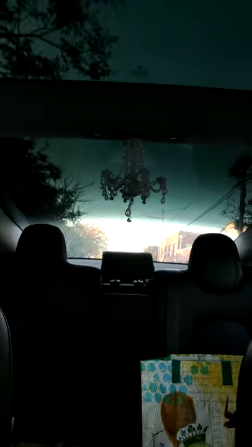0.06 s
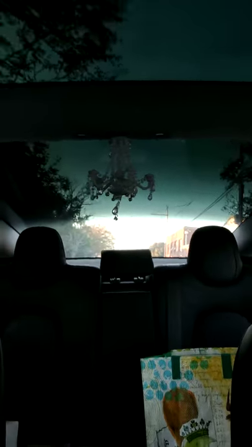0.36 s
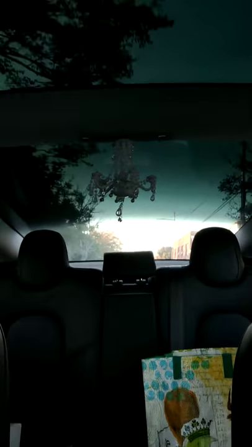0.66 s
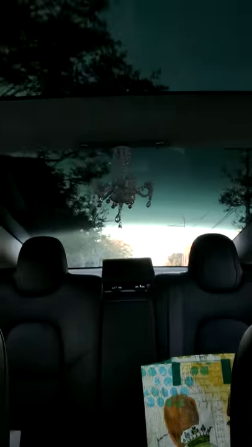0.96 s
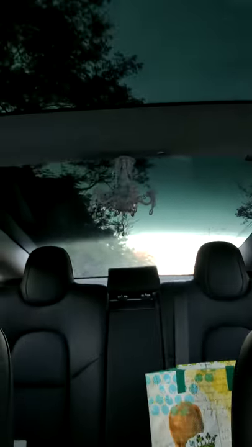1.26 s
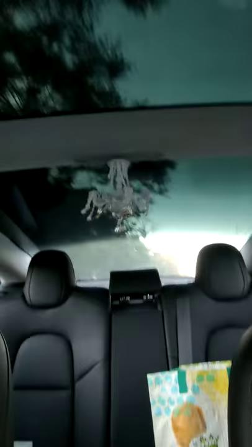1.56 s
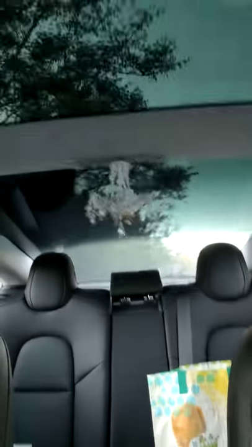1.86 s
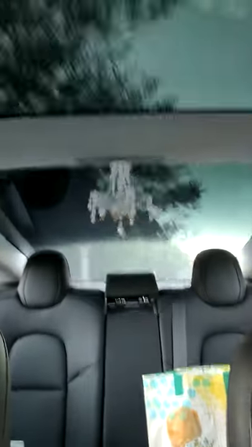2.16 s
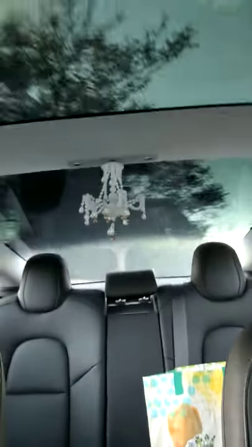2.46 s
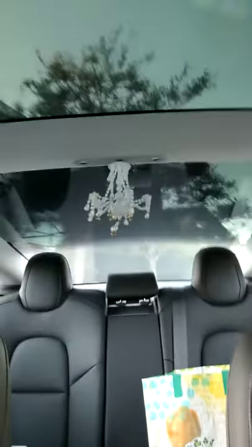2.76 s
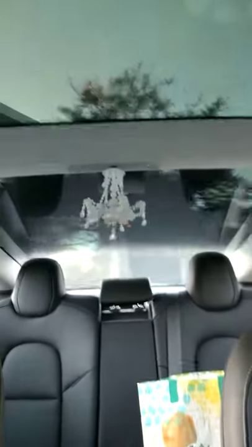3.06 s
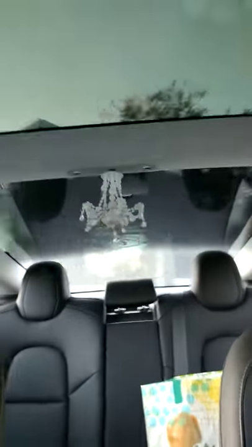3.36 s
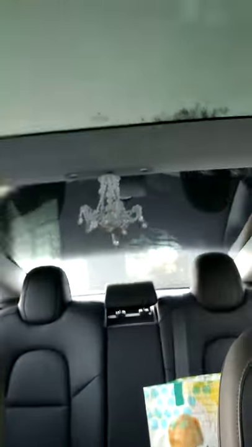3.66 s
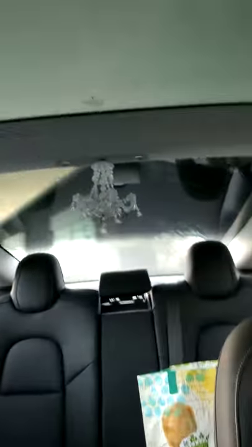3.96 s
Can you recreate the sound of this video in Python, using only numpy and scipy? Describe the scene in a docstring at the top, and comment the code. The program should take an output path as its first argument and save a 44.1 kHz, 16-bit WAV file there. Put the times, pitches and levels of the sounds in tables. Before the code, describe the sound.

Tiny bells on a hanging ornament tinkle faintly and very high inside a moving car, over deep road rumble and a lightly rattling panel. A turn indicator ticks five times, about every 0.7 seconds from 0.6 seconds. The wheels thump softly near 0.9 and 2.6 seconds. The tinkles come scattered at first, then thicken from about 3.3 seconds, with sharp little bead clacks until the end at 4 seconds.

```python
"""Tiny bells tinkle very high on an ornament that swings from the roof inside a moving car.
Each bell rings when its clapper hits and bounces. The ornament's beads rustle as they brush
each other and now and then clack together, and its glassy pendants clink faintly.
Below them the road rumbles, the wheels thump over bumps, a loose trim panel rattles
and the turn indicator ticks."""
import sys
import numpy as np
from scipy import signal
from scipy.fft import rfft, irfft
from scipy.io import wavfile
from scipy.ndimage import uniform_filter1d

SR = 44100
rng = np.random.default_rng(int(sys.argv[2]) if len(sys.argv) > 2 else 0)


def store_pcm(level_fs):
    """Save levels as 16-bit WAV."""
    pcm = np.round(np.clip(level_fs, -1, 1) * 32767).astype(np.int16)
    wavfile.write(sys.argv[1], SR, np.atleast_2d(pcm).T)


N = 176400  # 4 seconds

# A "colour" says how strong each frequency is. A "mode" is one tone that an object rings with.
# "t60" is the time a sound takes to fade by 60 dB.
# colour of the air hiss: f/Hz, relative level/dB
HISS_COLOUR = [(2500, -4.5), (4000, -0.5), (7000, -8), (9500, -3.5), (12000, -11)]
# colour of the road noise: f/Hz, relative level/dB
ROAD_COLOUR = [(25, -34.5), (38, -5.5), (49, 1), (60, -5.5), (75, -11), (95, -10.5), (135, -7.5),
               (165, -21), (195, -24.5), (225, -28), (330, -35.5), (480, -38.5), (650, -47.5), (950, -49),
               (1350, -62), (2500, -65.5), (5000, -96)]
# how loudly the road surface makes the cabin boom: t/s, level/dB
BOOM_LEVELS = [(0, -34), (.25, -44), (.9, -36), (1.12, -35), (1.5, -43.5), (2.15, -40), (2.85, -39.5),
               (3.62, -37), (3.83, -32), (4, -33.5)]
# bumps in the road: t/s, level/dB
ROAD_BUMPS = [(0.858, -29), (2.58, -25), (2.959, -33.5)]
# colour of the shaking panel: f/Hz, relative level/dB
PANEL_COLOUR = [(150, -27), (450, -2), (650, 1.5), (830, 2.5), (980, -1), (1250, -11.5), (1750, -10.5),
                (2600, -25), (8000, -54)]
# knocks of the loose panel: t/s, relative level/dB, f/Hz
PANEL_KNOCKS = [(.04, -53, 423), (.195, -62, 990), (.365, -62.5, 970), (.487, -63.5, 1300), (.74, -61, 974),
                (.885, -58.5, 975), (1.025, -56.5, 979), (1.08, -58, 907), (1.17, -61, 962),
                (1.385, -63.5, 950), (1.515, -62, 855), (1.64, -61, 1010), (1.983, -54.5, 933),
                (2.08, -64, 857), (2.155, -60, 834), (2.226, -63, 785), (2.565, -60, 890),
                (2.621, -60, 990), (2.69, -61, 1030), (2.869, -58.5, 784), (2.955, -60, 846),
                (3.068, -56.5, 856), (3.122, -57.5, 850), (3.458, -56, 777), (3.775, -51.5, 670)]
# indicator ticks: t/s, relative level/dB
INDICATOR_TICKS = [(0.5754, -42), (1.2957, -42), (2.0198, -43.5), (2.7389, -44), (3.459, -43)]
# modes of one tick: f/Hz, relative level/dB, t60/s
INDICATOR_MODES = [(1740, 1.5, 0.034), (1799, -3, 0.071), (1942, 3, 0.054), (2059, -3.5, 0.092),
                   (2633, -12, 0.085), (3570, -16.5, 0.072)]
# clinks of the pendants: t/s, relative level/dB
PENDANT_CLINKS = [(1.39, -70), (1.472, -64), (1.80, -72), (2.87, -71), (3.36, -69.5), (3.58, -66)]
# modes of the pendants: f/Hz, relative level/dB, t60/s
CLINK_MODES = [(6222, -9, .45), (7895, 0, .3), (9180, -5, .25), (12170, -11, .17), (13020, -14, .2)]
# colour of the bead rustle: f/Hz, relative level/dB
RUSTLE_COLOUR = [(500, -6.5), (2000, -1), (4000, -8), (6000, -5.5), (8300, -2.5), (9500, -3), (10300, -15),
                 (12000, -23)]
# how loudly the beads rustle as the ornament sways: t/s, level/dB
RUSTLE_LEVELS = [(0, -76), (.52, -73), (.72, -70.5), (.9, -66.5), (1.1, -66.5), (1.4, -72), (1.9, -71.5),
                 (2.2, -68.5), (2.55, -77), (2.85, -69.5), (3.15, -74.5), (3.37, -70.5), (3.5, -76.5),
                 (3.62, -67), (3.82, -72), (4, -58)]
# light touches of beads and trim: t/s, level/dB, centre f/Hz
LIGHT_TOUCHES = [(0.61, -58, 3900), (1.394, -56.5, 3760), (1.828, -63, 2860), (2.029, -57, 3760),
                 (2.1954, -62, 7500), (3.2269, -55, 3800), (3.6982, -59.5, 3140), (3.736, -58, 8400)]
# beads knocking together: t/s, level/dB, added brightness/(dB per octave)
BEAD_CLACKS = [(1.691, -47, 0.6), (3.267, -41, 2), (3.5477, -45, 0.5), (3.873, -47, 1), (3.9340, -39, 4.5)]
# colour of a clack before brightness is added: f/Hz, relative level/dB
BEAD_COLOUR = [(300, -29), (1400, -16), (2050, -1), (2350, -5.5), (2680, -1), (3200, -10.5), (4500, -12.5),
               (5400, -9.5), (5800, -14), (6450, -3.5), (7300, -17), (8300, -3.5), (9400, -15.5),
               (11500, -24.5), (13000, -50)]
# the one mode of each bell, by name: f/Hz, base t60/s (each strike scales it)
BELL_MODES = {"a": (10037, .42), "b": (10521, .22), "c": (10970, .36), "d": (11328, .22), "e": (11573, .26)}
# clapper strikes: t/s, bell name, relative level/dB, factor on the ring time
BELL_STRIKES = [(0, "a", -81, 1.8), (.205, "a", -63, 0.87), (0.53, "a", -51, 1.1), (.850, "a", -68.5, 1.3),
                (1.209, "a", -53, 0.71), (1.523, "a", -69.5, 0.54), (1.759, "a", -74, 1.2),
                (1.87, "a", -69, 2.2), (2.176, "a", -62, 0.35), (2.815, "a", -81, 1.1),
                (3.297, "a", -62, 1), (3.337, "a", -58, .7), (3.546, "a", -65, 1.8), (3.875, "a", -62, .9),
                (1.774, "b", -59, 0.43), (2.005, "b", -68, 1.2), (2.78, "b", -73, .9),
                (3.355, "b", -61, 0.55), (3.668, "b", -48, 0.55), (3.728, "b", -63, 1),
                (1.477, "c", -72, 0.7), (1.789, "c", -64.5, 0.87), (2.13, "c", -61, 0.19),
                (2.795, "c", -71, .9), (3.363, "c", -65.5, 1.2), (3.936, "c", -69, 1.1),
                (.552, "d", -68, .9), (.68, "d", -74, .8), (.974, "d", -67.5, 0.67),
                (1.228, "d", -64, 0.99), (2.199, "d", -69, .7), (1.80, "d", -71, .9),
                (2.51, "d", -82, 0.92), (3.118, "d", -63.5, 0.4), (3.439, "d", -72, .8),
                (3.737, "d", -48.5, 0.67), (3.889, "d", -46.5, 0.65), (.533, "e", -59, 0.65),
                (1.215, "e", -65, .9), (1.525, "e", -68.5, 0.83), (1.721, "e", -64.5, 0.9),
                (3.275, "e", -65, 1.3), (3.55, "e", -68, 1.3), (3.875, "e", -54, 0.57)]


def amp(db):
    """Turns decibels into a volume factor."""
    return 10 ** (np.asarray(db) / 20)


def unit(x):
    """Scales a sound to an average strength (rms) of 1."""
    return x / np.sqrt(np.mean(x ** 2) + 1e-20)


def add(mix, s, sound):
    """Mixes a sound in, starting s seconds from the beginning."""
    part = mix[max(round(s * SR), 0):][:len(sound)]
    part += sound[:len(part)]


def fade(t, t60):
    """A curve that starts at 1 and falls by 60 dB every t60 seconds."""
    return np.exp(-np.log(1000) * t / t60)


def seconds(length):
    """The time of every sample, for a length in seconds."""
    return np.arange(round(length * SR)) / SR


def colour(x, points):
    """Gives a sound the colour drawn by (f/Hz, level/dB) points, at strength 1."""
    hz, db = np.transpose(points)
    f = np.fft.rfftfreq(len(x), 1 / SR)
    gain = amp(np.interp(np.log(f + 1), np.log(hz), db))
    return unit(irfft(rfft(x) * gain, len(x)))


def noise_band(size, hz, octaves):
    """Noise around one pitch, with soft edges and little above 10 kHz."""
    f = np.fft.rfftfreq(size, 1 / SR)
    distance = np.log2((f + 1) / hz) / octaves
    treble_cut = 1 / (1 + (f / 10000) ** 20)
    return unit(irfft(rfft(rng.standard_normal(size)) * treble_cut / (1 + distance ** 2), size))


def patter(per_s, spread_db, t60):
    """Small random hits, each scattered by the cabin into a short burst of noise."""
    hits = (rng.random(N) < per_s / SR) * amp(spread_db * np.minimum(rng.exponential(1, N), 4))
    power = signal.lfilter([1], [1, -fade(1 / SR, t60) ** 2], hits ** 2)
    return np.sqrt(power) * rng.standard_normal(N)


def air_hiss():
    """The air makes a faint, steady hiss."""
    return amp(-73.5) * colour(rng.standard_normal(N), HISS_COLOUR)


def road_rumble(smooth_s=0.084):
    """The cabin's deep boom and the tyres' drone swell with the road surface."""
    out = np.zeros(N)
    noise = colour(rng.standard_normal(N), ROAD_COLOUR)
    boom = signal.sosfiltfilt(signal.butter(4, 75, fs=SR, output="sos"), noise)  # below 75 Hz
    drone = noise - boom
    boom_db = np.interp(seconds(N / SR), *np.transpose(BOOM_LEVELS))
    drone_db = -26 + 0.41 * boom_db
    for part, db in (boom, boom_db), (drone, drone_db):
        power = uniform_filter1d(part ** 2, int(2 * smooth_s * SR))
        power = uniform_filter1d(power, int(smooth_s * SR))
        out += amp(db) * part / np.sqrt(power)  # even out chance swells, then set the level
    return out


def wheel_thumps(boom_hz=48.65, swell_s=0.033):
    """A wheel drops over a bump and the cabin booms for a few cycles."""
    out, t = np.zeros(N), seconds(.5)
    swell = (t / swell_s) ** 2 * np.exp(2 - 2 * t / swell_s)
    for s, db in ROAD_BUMPS:
        add(out, s, amp(db) * swell * np.sin(2 * np.pi * (boom_hz * t + rng.random())))
    return out


def loose_panel(rise_s=0.0016, gap_s=.012, loss_db=3):
    """A trim panel shakes all the time; each knock is three quick, hollow hits that differ in pitch."""
    out = amp(-69) * colour(patter(per_s=70, spread_db=0.5, t60=0.041), PANEL_COLOUR)
    t = seconds(.5)
    shape = np.minimum(t / rise_s, 1) * fade(t, t60=0.084)
    for s, db, hz in PANEL_KNOCKS:
        for k, (late, detune) in enumerate(rng.uniform(-0.502, 0.495, size=(3, 2))):
            tone = np.sin(2 * np.pi * hz * (1 + k * 0.159 * detune) * t)
            rattle = amp(-0.5) * noise_band(len(t), hz, octaves=.4)
            start = s + k * gap_s * (1 + .5 * late)
            add(out, start, amp(db + 2.5 - k * loss_db) * shape * (tone + rattle))
    return out


def indicator(rise_s=0.0023, echo_s=.0105):
    """The same hollow tick every time: its close tones waver against each other as they fade."""
    out, t = np.zeros(N), seconds(0.67)
    rise = np.minimum(t / rise_s, 1)
    tick = sum(amp(db) * fade(t, t60) * np.sin(2 * np.pi * hz * t) for hz, db, t60 in INDICATOR_MODES)
    tick += amp(-15.5) * noise_band(len(t), hz=1320, octaves=1.0) * fade(t, t60=0.12)
    add(tick, echo_s, 0.58 * tick * rise)  # first echo from the cabin
    for s, db in INDICATOR_TICKS:
        add(out, s, amp(db - 0.5) * rise * tick)
    return out


def pendants():
    """Glassy pendants clink faintly, with a new balance of their tones each time."""
    out, t = np.zeros(N), seconds(.5)
    for s, db in PENDANT_CLINKS:
        for hz, mode_db, t60 in CLINK_MODES:
            chance_db = rng.uniform(-2, 4.6)
            add(out, s, amp(db + mode_db + chance_db) * fade(t, t60) * np.sin(2 * np.pi * hz * t))
    return out


def bead_rustle():
    """Strings of beads brush each other as the ornament sways."""
    sway_db = np.interp(seconds(N / SR), *np.transpose(RUSTLE_LEVELS))
    return amp(sway_db) * colour(patter(per_s=330, spread_db=4.5, t60=0.1), RUSTLE_COLOUR)


def light_touches():
    """Light touches of beads and trim each make a short puff of noise."""
    out, t = np.zeros(N), seconds(0.27)
    for s, db, hz in LIGHT_TOUCHES:
        add(out, s, amp(db) * fade(t, t60=0.098) * noise_band(len(t), hz, octaves=0.41))
    return out


def bead_clacks(rise_s=0.00044, crack_s=0.0012, ring_hz=2680):
    """Beads knock together: a sharp crack, one clear tone and the cabin's quick answer."""
    out, t = np.zeros(N), seconds(0.27)
    tail = fade(t, t60=0.099)
    crack = 1.774 * np.exp(-t / crack_s)
    shape = np.minimum(t / rise_s, 1) * (tail + crack)
    ring = tail * np.sin(2 * np.pi * ring_hz * t)
    for s, db, brightness in BEAD_CLACKS:
        brightened = [(hz, level + brightness * np.log2(hz)) for hz, level in BEAD_COLOUR]
        add(out, s, amp(db - 3.5 - brightness) * ring)  # brighter clacks have a weaker tone
        add(out, s, amp(db) * shape * colour(rng.standard_normal(len(t)), brightened))
    return out


def bells(rise_s=0.0021, bounce_s=0.0093, flutter_depth=0.16, flutter_hz=45):
    """The clapper hits, bounces and touches again later; every contact rings the bell's one high tone."""
    out, t = np.zeros(N), seconds(0.81)
    rise = 1 - np.exp(-t / rise_s)
    ping = 0.5 * fade(t, t60=0.063)
    flutter_filter = signal.butter(2, flutter_hz, fs=SR)
    for s, name, db, stretch in BELL_STRIKES:
        hz, base_t60 = BELL_MODES[name]
        ring_s = base_t60 * stretch
        contact = rise * (fade(t, 1.3 * ring_s) + ping)
        ring = contact + 0j  # complex numbers let contacts add up in or out of step
        bounces = zip(rng.exponential(bounce_s, size=3), rng.uniform(0, 0.61 * np.pi, size=3))
        for delay, phase in bounces:
            add(ring, delay, 0.44 * contact * np.exp(1j * phase))
        for when, turn in rng.random((3, 2)):  # softer, later touches
            add(ring, when * .5 * ring_s, 0.12 * contact * np.exp(2j * np.pi * turn))
        flutter = unit(signal.lfilter(*flutter_filter, rng.standard_normal(len(t))))
        ring *= 1 + flutter_depth * flutter  # a quick, restless waver in the bell's tone
        tone = (ring * np.exp(2j * np.pi * hz * t)).imag
        add(out, s, amp(db - 4) * tone)
    return out


def scene():
    """Adds the car and the ornament together in one channel."""
    car = air_hiss() + road_rumble() + wheel_thumps() + loose_panel() + indicator()
    ornament = pendants() + bead_rustle() + light_touches() + bead_clacks() + bells()
    return (car + ornament)[None]


def record(dry):
    """Cuts off the very highest treble, above 15750 Hz."""
    treble_cut = signal.firwin(511, 15750, window=("kaiser", 9), fs=SR)
    return signal.oaconvolve(dry, treble_cut[None], "same")


dry = scene()
out = record(dry)
store_pcm(out)
```